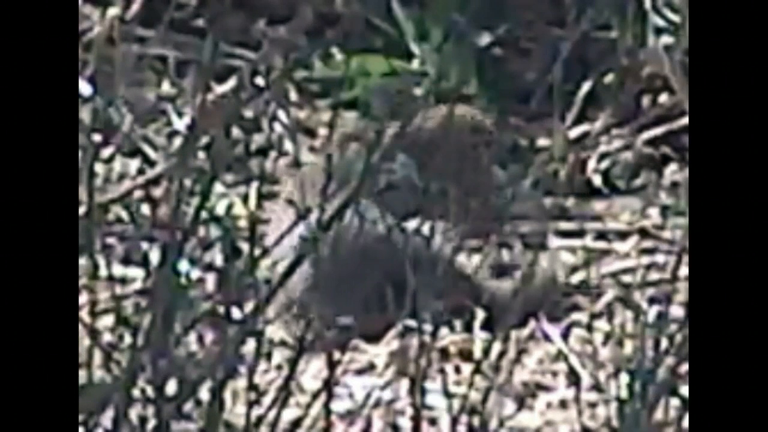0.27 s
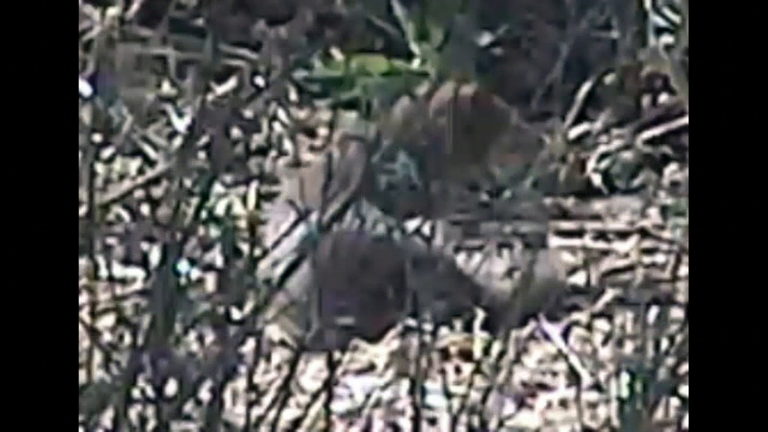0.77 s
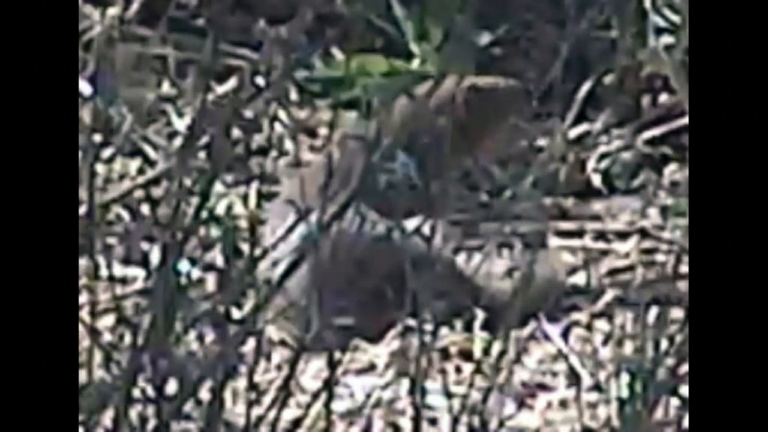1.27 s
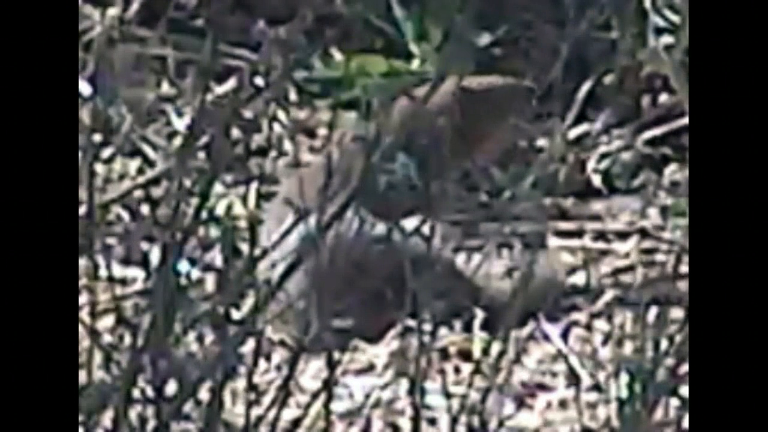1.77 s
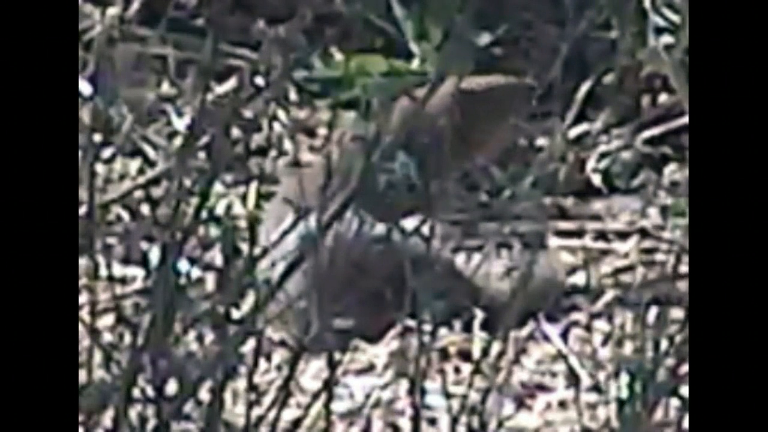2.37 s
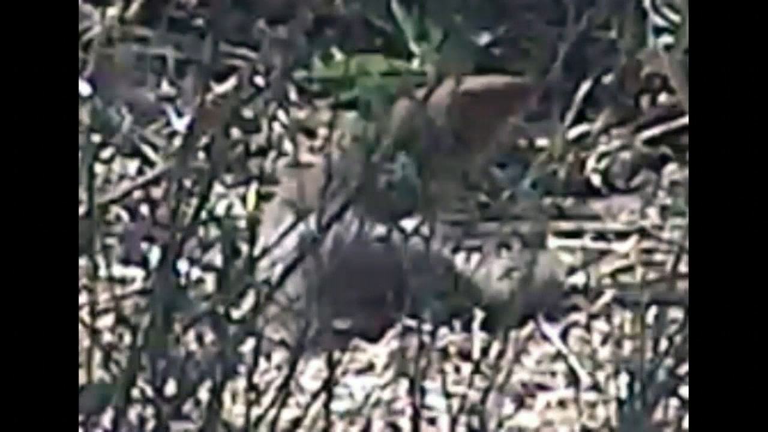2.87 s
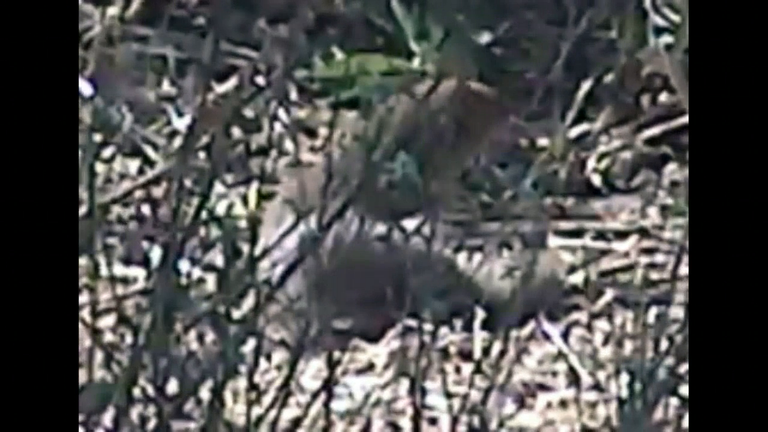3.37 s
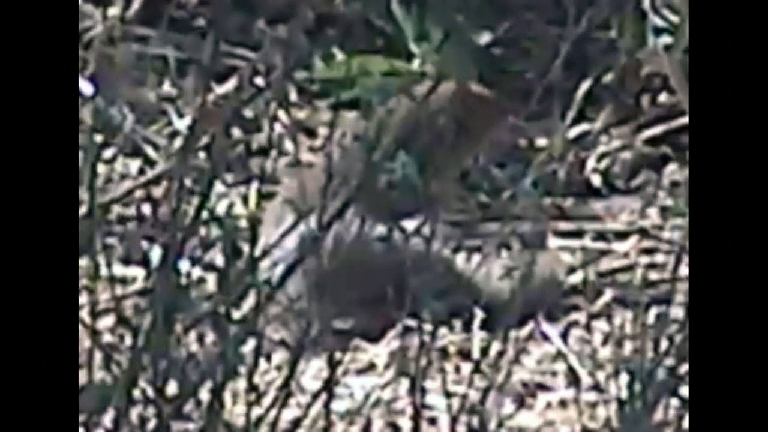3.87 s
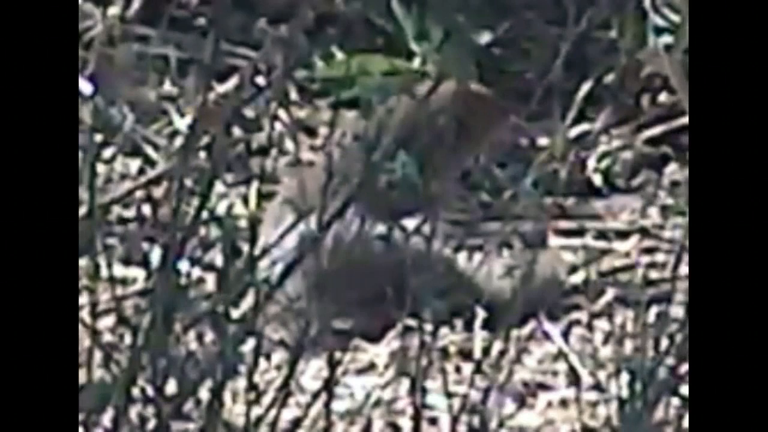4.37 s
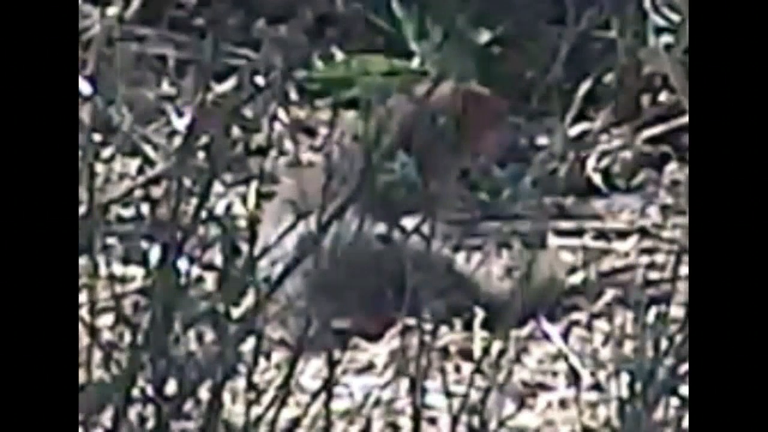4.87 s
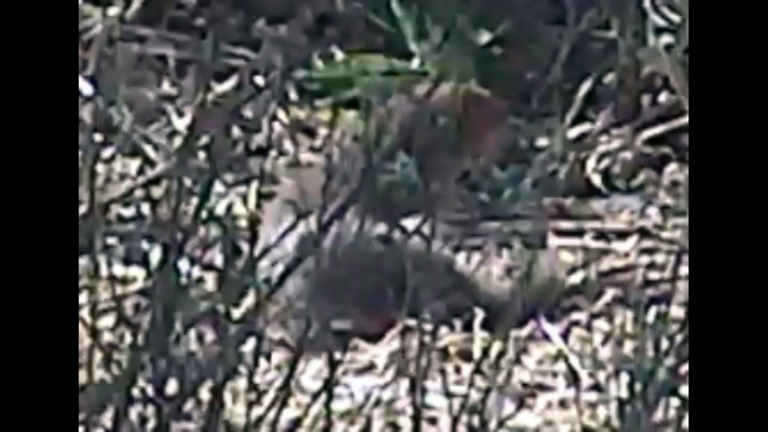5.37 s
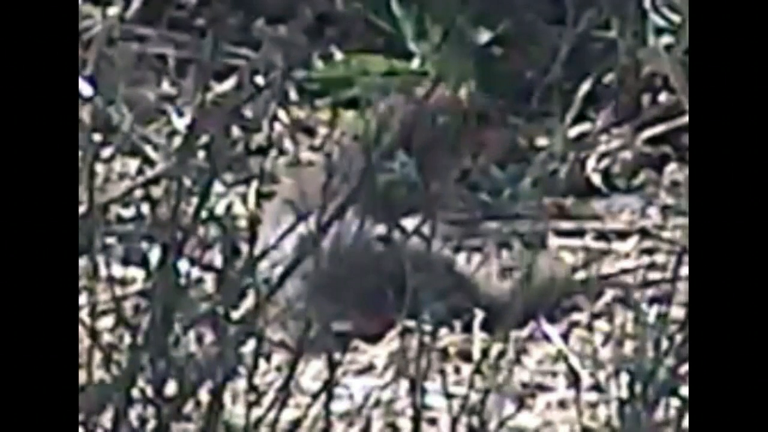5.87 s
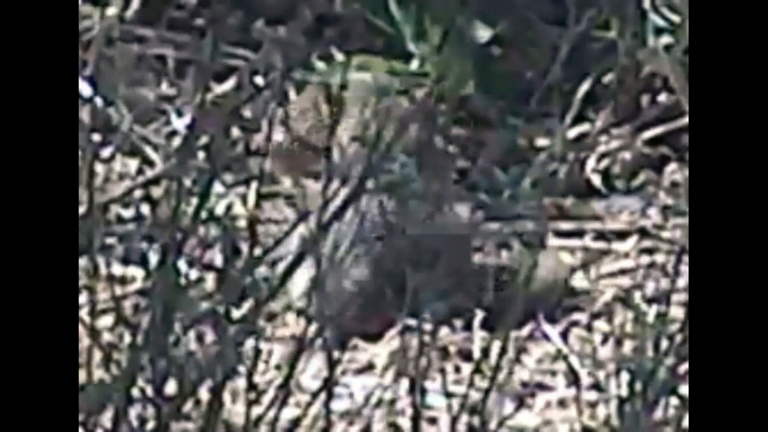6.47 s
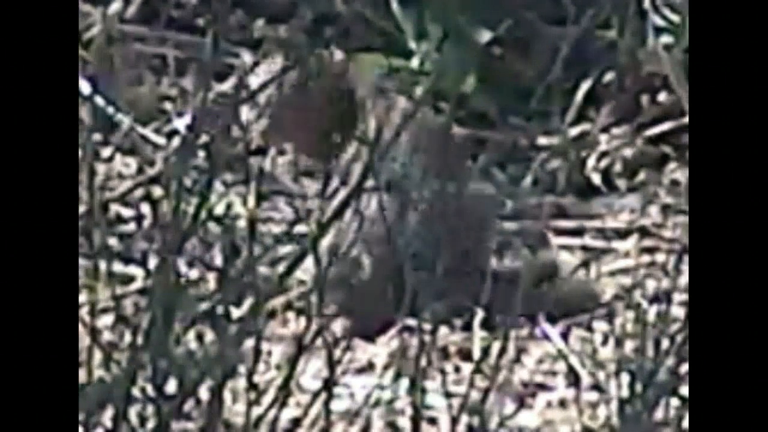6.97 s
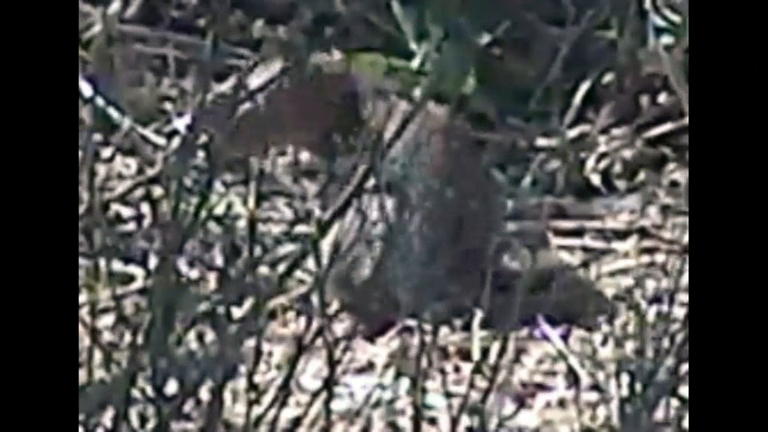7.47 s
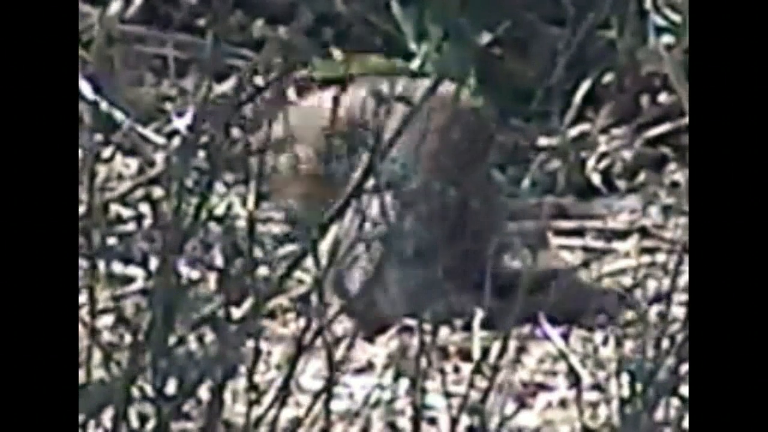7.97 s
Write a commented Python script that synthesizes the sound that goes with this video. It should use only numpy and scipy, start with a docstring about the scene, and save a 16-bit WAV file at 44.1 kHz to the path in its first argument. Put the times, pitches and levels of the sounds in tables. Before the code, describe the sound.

A dense outdoor chorus of small callers fills dry scrub by a waterhole: grainy, rasping clicks in overlapping bursts, mostly mid to high pitched, sprinkled with countless tiny falling chirps. From 0 to 3 s it is full and busy, loudest at the very start, with thin wheezy whistles sliding and warbling nearby. After 3 s it thins, reaching its quietest around 4 to 5 s, where separate rasping bursts and faint squeaks show through. From about 5.3 to 6.2 s quick, sharp little chirps cluster; then the crowd thickens steadily, with fewer distinct whistles, and is strong again by 8 s. Faint, brief rising water plops occur near 0.3, 1.2, 2.1, 3.3 and 7.2 s. Soft hiss and a very low steady mains hum lie beneath. The mono pickup is narrow, with blunted treble and only slight close echoes.

```python
"""Dry scrub by a waterhole, with a dense chorus: a crowd of small callers rasps in swelling, overlapping bursts,
made of uneven clicks in narrow bands. Nearer callers stand out as thin, wheezy whistles, which are gliding
sines, among many short chirps. A few drops plop in the water as brief rising sines. Below lie a soft hiss of
shaped noise and the mains hum of the recorder's line, whose narrow channel cuts the treble."""
import sys
import numpy as np
from scipy import signal
from scipy.fft import rfft, irfft
from scipy.io import wavfile

SR = 44100
rng = np.random.default_rng(int(sys.argv[2]) if len(sys.argv) > 2 else 0)


def master_out(mix):
    """Clip the mix to full scale and print it as 16-bit PCM to the path in sys.argv[1]."""
    frames = np.transpose(np.atleast_2d(mix))
    ceiling = np.clip(frames, -1, 1)
    pcm = np.round(ceiling * 32767).astype(np.int16)
    wavfile.write(sys.argv[1], SR, pcm)


N = 361179   # length in samples
CUTOFF_HZ = 6880   # top of the narrow channel

# Pitches that anchor the low, middle and high voices of the crowd, [Hz].
REGISTER_HZ = (1900, 3300, 5400)


def from_db(db):
    """Decibels to an amplitude factor."""
    return 10 ** (np.asarray(db) / 20)


def rms_one(x):
    """Scales a signal to an RMS of 1."""
    return x / np.sqrt(np.mean(x ** 2) + 1e-20)


def at_hz(points, hz):
    """Reads a colour curve of (Hz, dB) points along log frequency."""
    point_hz, point_db = np.transpose(points)
    return np.interp(np.log(hz), np.log(point_hz), point_db)


def drift(rate_hz):
    """Slow chance: coarse noise through a double one-pole low-pass, with a spread of 1."""
    step, settle = 40, 2000   # samples per coarse step; coarse steps dropped while the filter settles
    pole = np.exp(-2 * np.pi * rate_hz * step / SR)
    noise = rng.standard_normal(N // step + settle + 2)
    slow = signal.lfilter([1], [1, -2 * pole, pole * pole], noise)[settle:]
    return np.interp(np.arange(N) / step, np.arange(len(slow)), rms_one(slow))


def add(out, start_s, sound):
    """Mixes a sound in from its start time."""
    i = max(round(start_s * SR), 0)
    out[i:i + len(sound)] += sound[:N - i]


def loudness(hz):
    """Crowd level curve in dB at one pitch: swell read between the registers, nearby bursts and rasp colour."""
    # Swell of the whole crowd between bursts. Each row: time in seconds, level in dB ahead of the other
    # offsets, high voices against that level in dB.
    swell_rows = [(0.0, -22.5, -6), (.29, -28, -1.5), (.75, -28.5, -4.5), (.93, -30, -1.5),
                  (1.2, -29, -3.5), (2.2, -30.5, -2.5), (2.379, -33.5, -3), (2.55, -32, 1), (2.78, -31, -2),
                  (3.74, -36.5, -4.5), (4.1, -44, -6.5), (4.36, -43.5, -3), (4.52, -37.5, -7),
                  (4.62, -45, -1), (4.84, -34.5, -4.5), (4.99, -40.5, -7), (5.1, -37.5, -4.5),
                  (5.45, -33.5, -4), (6.02, -37, -0.5), (6.18, -33.5, -4), (7.2, -29.5, -8),
                  (7.5, -28.5, -7.5), (7.9, -29, -5.5), (8.19, -25.5, -5.5)]
    # Groups of callers bursting out together. Each row: time in seconds, centre in Hz,
    # lift in dB at that time and pitch.
    burst_rows = [(.39, 1910, 3.5), (.53, 5430, 4.5), (.66, 3000, 3.5), (.85, 3200, 2.5), (1.53, 2180, 2),
                  (1.71, 2840, 2), (2.17, 1900, 4), (2.28, 2820, 3.5), (2.83, 4500, 4), (3.001, 2200, 6.5),
                  (3.26, 4000, 7), (3.46, 2200, 4.5), (3.85, 2300, 9), (3.99, 4860, 7), (4.19, 2800, 10),
                  (4.26, 5400, 6.5), (4.44, 2970, 7.5), (4.72, 5400, 3.5), (4.89, 3280, 2),
                  (4.9, 5200, 2.5), (5.08, 3300, 8), (5.16, 1900, 5), (5.36, 3430, 7.5), (5.85, 4530, 5.5),
                  (5.97, 2600, 10), (6.157, 4000, 6), (6.25, 1900, 2.5), (6.5, 2600, 3), (7.1, 2560, 2.5),
                  (7.22, 2600, 1), (7.809, 4130, 4.5), (8.06, 4500, 4)]
    # Colour of the rasp inside the registers. Each row: frequency in Hz, relative level in dB.
    rasp_colour = [(900, -20.5), (1300, -13.5), (1700, -6.5), (2200, -1), (2800, 1.5), (3400, 0),
                   (4200, -6), (5000, -4.5), (5800, -4.5), (6250, -15), (6500, -14.5), (6800, -25)]
    low_voices_db, middle_voices_db = -10.5, -6   # against the level
    burst_s, burst_octaves = .045, .99   # spread of a burst in time and in pitch

    t = np.arange(0, N / SR + .01, .005)
    swell_s, level_db, high_voices_db = np.transpose(swell_rows)
    low, middle, high = [np.interp(np.log(hz), np.log(REGISTER_HZ), one) for one in np.eye(3)]
    register_db = low * low_voices_db + middle * middle_voices_db + high * high_voices_db
    swell = np.interp(t, swell_s, level_db + register_db)

    when_s, centre_hz, lift_db = np.transpose(burst_rows)
    near = lift_db * np.exp(-.5 * (np.log2(hz / centre_hz) / burst_octaves) ** 2)
    lift = near @ np.exp(-.5 * ((t - when_s[:, None]) / burst_s) ** 2)
    return np.interp(np.arange(N) / SR, t, swell + lift) + at_hz(rasp_colour, hz)


def crowd(grain_db, burst_db, own_db):
    """Dense uneven clicks in narrow neighbouring bands; chance bursts cover several bands at once."""
    grain = from_db(grain_db * rng.standard_normal((2, N)))
    clicks = rng.standard_normal((2, N)) * grain
    edges_hz = np.linspace(800, 6900, num=21)
    bursts = [drift(8.0) for _ in range(6)]
    rattle_db = .52 * drift(21)   # fast throb shared by all bands
    out = np.zeros(N)
    for k, (low_hz, high_hz) in enumerate(zip(edges_hz, edges_hz[1:])):
        band_pass = signal.butter(2, [low_hz, high_hz], "band", fs=SR, output="sos")
        band = signal.sosfilt(band_pass, clicks[k % 2])
        # Crossfade from one burst curve to the next over four bands.
        group, share = divmod(k / 4, 1)
        burst = np.sqrt(1 - share) * bursts[int(group)] + np.sqrt(share) * bursts[int(group) + 1]
        chance_db = rattle_db + burst_db * burst + own_db * drift(11)
        out += rms_one(band) * from_db(loudness((low_hz + high_hz) / 2) - 8.5 + chance_db)
    return out


def glide(long_s, first_hz, middle_hz, last_hz, level_db, waver_hz, flutter_db, fade_s=.007):
    """A near sine bending through three pitches; the given chance curves waver its pitch and flutter its level."""
    u = np.linspace(0, 1, num=round(long_s * SR))
    # A random stretch of the chance curves, centred on zero.
    i = rng.integers(0, N - SR) + np.arange(len(u))
    waver = waver_hz[i] - waver_hz[i].mean()
    flutter = flutter_db[i] - flutter_db[i].mean()
    # Parabola through the pitches at start, middle and end.
    hz = first_hz * (1 - u) * (1 - 2 * u) + middle_hz * 4 * u * (1 - u) + last_hz * u * (2 * u - 1)
    fade = np.clip(np.minimum(u, 1 - u) * long_s / fade_s, 0, 1)
    tone = np.sin(2 * np.pi * np.cumsum(hz + waver) / SR)
    return np.sqrt(2) * fade * from_db(level_db + flutter) * tone


def whistles():
    """Near callers: thin gliding sines whose quick chance in pitch and level makes them warble and wheeze."""
    # Each row: start in seconds, length in seconds (both without the margin), first, middle and last pitch
    # in Hz, RMS level in dB around which it flutters.
    whistle_rows = [(0.038, 0.045, 3370, 3210, 3160, -34.5), (0.046, 0.19, 5470, 5340, 5160, -34.5),
                    (0.146, 0.13, 6100, 5890, 5910, -35), (0.178, 0.11, 3750, 3506, 3560, -34),
                    (0.489, 0.048, 2430, 2360, 2300, -39.5), (0.522, 0.099, 5380, 5360, 5160, -34),
                    (0.642, 0.067, 4400, 4070, 3900, -35), (0.64, 0.057, 3500, 3500, 3420, -35.5),
                    (0.597, 0.082, 5990, 5950, 5740, -37.5), (0.668, 0.081, 5310, 5350, 5270, -37.5),
                    (0.708, 0.12, 3320, 3480, 3560, -35.5), (0.726, 0.12, 3880, 4060, 4130, -40),
                    (0.832, 0.078, 3520, 3190, 3050, -30.5), (0.911, 0.029, 3200, 3080, 2930, -32),
                    (0.935, 0.084, 3130, 3230, 3190, -36), (1.029, 0.09, 5360, 5260, 5340, -35.5),
                    (1.123, 0.24, 5130, 4960, 5060, -38), (1.255, 0.125, 3460, 3330, 3260, -36.5),
                    (1.395, 0.08, 3070, 3010, 2900, -37.5), (1.41, 0.18, 3360, 3390, 3560, -37.5),
                    (1.522, 0.047, 5800, 5855, 5800, -36.5), (1.533, 0.028, 3240, 3070, 3170, -35),
                    (1.563, 0.035, 2725, 2450, 2400, -37.5), (1.652, 0.047, 2755, 2514, 2300, -36),
                    (1.677, 0.069, 2944, 3100, 3250, -38), (1.97, 0.11, 3880, 3600, 3280, -39.5),
                    (2.027, 0.039, 5660, 5520, 5500, -36.5), (2.07, 0.035, 5330, 5410, 5300, -32),
                    (2.099, 0.14, 3130, 2985, 2860, -40.5), (2.245, 0.06, 2624, 2760, 2750, -39),
                    (2.21, 0.06, 5350, 5400, 5250, -40.5), (2.346, 0.067, 2740, 2790, 2760, -38),
                    (2.434, 0.028, 5500, 5170, 4770, -42), (2.497, 0.097, 5700, 5790, 5660, -37.5),
                    (2.586, 0.045, 5450, 5460, 5560, -36.5), (2.65, 0.1, 5570, 5710, 5670, -32),
                    (2.725, 0.087, 3280, 2950, 2690, -41), (3.084, 0.04, 3390, 3600, 4040, -37),
                    (3.121, 0.034, 3880, 3710, 3540, -37), (3.15, 0.055, 3950, 3810, 3830, -43.5),
                    (3.137, 0.038, 5100, 5050, 4880, -52), (3.201, 0.057, 4850, 4640, 4400, -41),
                    (3.261, 0.1, 4370, 4150, 4000, -44), (3.365, 0.15, 5220, 5200, 5250, -43),
                    (3.539, 0.1, 3800, 3790, 3400, -46), (3.613, 0.021, 6080, 5500, 5300, -39.5),
                    (3.664, 0.019, 5230, 5900, 5170, -40), (3.678, 0.015, 3300, 3480, 3570, -36),
                    (3.706, 0.012, 3750, 3410, 3400, -30.5), (3.722, 0.02, 3500, 3600, 3450, -38.5),
                    (3.754, 0.089, 3000, 2240, 1460, -50.5), (3.781, 0.029, 3500, 3380, 3400, -36.5),
                    (4.268, 0.1, 4730, 4730, 4920, -44), (4.288, 0.092, 3200, 3280, 3200, -44),
                    (4.352, 0.063, 4750, 4760, 4940, -43), (4.419, 0.045, 4950, 5040, 5050, -45),
                    (4.384, 0.082, 3220, 3130, 2960, -43.5), (4.466, 0.13, 3035, 3090, 2970, -48),
                    (4.42, 0.052, 2800, 2570, 2450, -43), (4.632, 0.26, 6070, 6260, 5750, -50),
                    (4.862, 0.019, 6400, 5880, 5820, -44), (4.897, 0.019, 6000, 5870, 5830, -38),
                    (5.267, 0.15, 5790, 5820, 5870, -41), (5.404, 0.068, 5670, 5450, 5480, -43),
                    (5.403, 0.018, 3380, 3330, 3250, -37.5), (5.418, 0.022, 3350, 3650, 3560, -38),
                    (5.46, 0.017, 3900, 3680, 3500, -38), (5.481, 0.16, 4770, 5030, 5090, -41),
                    (5.55, 0.082, 5110, 5250, 5410, -35.5), (5.576, 0.022, 3480, 4020, 3450, -35),
                    (5.63, 0.034, 3590, 3730, 3760, -37.5), (5.63, 0.034, 3750, 2800, 1950, -43),
                    (5.667, 0.033, 1880, 1700, 1720, -48), (5.742, 0.048, 3600, 3270, 3520, -39),
                    (5.798, 0.015, 4170, 4100, 3820, -34.5), (5.827, 0.045, 3500, 3280, 3500, -38.5),
                    (5.872, 0.035, 5200, 5100, 5150, -41), (5.908, 0.027, 3480, 3330, 3270, -32),
                    (5.962, 0.046, 3300, 3760, 3250, -35.5), (5.999, 0.023, 5340, 5130, 4900, -30.5),
                    (6.065, 0.037, 4220, 3750, 3200, -45), (6.096, 0.017, 5740, 5620, 5300, -36.5),
                    (6.127, 0.046, 3520, 3690, 3380, -36), (6.141, 0.038, 5230, 5030, 4800, -34.5),
                    (6.295, 0.04, 3760, 3750, 3830, -44), (6.436, 0.045, 3800, 3710, 3830, -40.5),
                    (6.54, 0.07, 3550, 3170, 3090, -43), (6.61, 0.064, 3100, 3900, 4280, -47),
                    (6.738, 0.03, 5400, 5200, 5050, -42), (6.789, 0.093, 4000, 3300, 3080, -46),
                    (7.05, 0.049, 5850, 5700, 5460, -40.5), (7.118, 0.046, 2600, 2390, 2150, -38),
                    (7.203, 0.05, 3250, 2915, 2790, -38.5), (7.358, 0.049, 2850, 2736, 2830, -40.5),
                    (7.589, 0.066, 4960, 4880, 4980, -43), (7.675, 0.044, 3780, 3930, 4050, -39),
                    (7.679, 0.027, 3220, 3180, 3140, -36), (7.932, 0.042, 4200, 3990, 3700, -37.5),
                    (8.088, 0.063, 2550, 2490, 2500, -38.5)]
    margin_s = .006   # extra room at each end for the fades
    out = np.zeros(N)
    waver_hz, flutter_db = 30 * drift(60), 2.8 * drift(55)
    for start_s, long_s, *voice in whistle_rows:
        add(out, start_s - margin_s, glide(long_s + 2 * margin_s, *voice, waver_hz, flutter_db))
    return out


def chirps(far_db, count):
    """Many short, mostly falling, buzzy glides, each set against the crowd's curve at its onset by far_db and chance."""
    out = np.zeros(N)
    waver_hz, flutter_db = 40 * drift(70), 3.5 * drift(60)
    levels = [loudness(hz)[::441] for hz in REGISTER_HZ]   # 100 values a second
    for when, pitch, length, bend, arch, size in rng.random((count, 6)):
        start_s = when * N / SR
        hz = 2000 + 4200 * pitch
        long_s = .015 + .05 * length ** 3   # mostly short
        crowd_db = np.interp(hz, REGISTER_HZ, [level[int(start_s * 100)] for level in levels])
        level_db = crowd_db + far_db + 5 * size ** 2
        fall_hz = 600 * (bend - .25)   # negative for a rise
        middle_hz = hz + 200 * (arch - .3)
        chirp = glide(long_s, hz + fall_hz / 2, middle_hz, hz - fall_hz / 2, level_db, waver_hz, flutter_db)
        add(out, start_s, chirp)
    return out


def scrub(x, echo_db):
    """Three faint echoes from ground and bushes, as delayed copies."""
    out = x.copy()
    for lag_s in (.011, .023, .041):
        add(out, lag_s, from_db(echo_db) * x)
    return out


def drops():
    """A trapped bubble rings briefly as a decaying sine and rises in pitch as it nears the surface."""
    # Each row: start in seconds, level in dB from which the ring decays, starting pitch in Hz.
    drop_rows = [(0.295, -47, 556), (0.369, -41.5, 520), (1.159, -45.5, 750), (2.072, -44.5, 750),
                 (3.098, -50, 350), (3.331, -42.5, 560), (3.876, -49, 340), (5.479, -54, 370),
                 (7.242, -47.5, 485)]
    attack_s, decay_s = .00072, .063   # linear rise; time to fall by 60 dB
    out = np.zeros(N)
    t = np.arange(round(.06 * SR)) / SR
    for start_s, level_db, hz in drop_rows:
        phase = 2 * np.pi * hz * (t + 12 * t ** 2)
        envelope = from_db(level_db - 60 * t / decay_s) * np.minimum(t / attack_s, 1)
        add(out, start_s, envelope * np.sin(phase))
    return out


def air():
    """Smooth hiss of air and recorder: noise coloured in the spectrum and cut at the channel's top."""
    # Each row: frequency in Hz, relative density in dB per Hz.
    hiss_colour = [(20, -18), (40, -1.5), (75, 2), (125, -1.5), (200, -9), (300, -5), (500, 4), (900, 1.5),
                   (1600, -5.5), (6500, -15)]
    hiss_db = -58   # RMS
    hz = np.maximum(np.arange(N // 2 + 1) * SR / N, 1)
    spectrum = rfft(rng.standard_normal(N)) * from_db(at_hz(hiss_colour, hz)) * (hz < CUTOFF_HZ)
    return from_db(hiss_db) * rms_one(irfft(spectrum, N))


def hum():
    """Mains hum: sines at odd multiples of the mains, wavering slightly in level."""
    # Each row: multiple of the mains frequency, RMS level in dB around which the tone wavers.
    tone_rows = [(1, -70.5), (3, -63.5), (5, -70.5), (7, -77.5), (9, -84)]
    mains_hz, waver_db = 50.07, 2.0
    turn = 2 * np.pi * mains_hz * np.arange(N) / SR
    out = np.zeros(N)
    for multiple, level_db in tone_rows:
        level = from_db(level_db + waver_db * drift(13.0))
        out += np.sqrt(2) * level * np.sin(round(multiple) * turn)
    return out


def scene():
    """Rasping crowd, whistles and chirps with their echoes, then drops, hiss and hum, in mono."""
    far = chirps(far_db=-12.0, count=1700)   # 12 to 7 dB below the crowd's curve
    calls = scrub(whistles() + far, echo_db=-21)
    rasp = crowd(grain_db=3.0, burst_db=1.38, own_db=2.21)
    return (rasp + calls + drops() + air() + hum())[None]


def record(dry):
    """The narrow channel ends in a steep cut; a slight square-law bend adds a very faint shimmer above it."""
    # Bottom and top of the shimmer, [Hz].
    shimmer_hz = (9000, 15700)
    bend_db = -19   # gain on the squared line
    channel = signal.ellip(12, .3, 60, CUTOFF_HZ, fs=SR, output="sos")
    line = signal.sosfilt(channel, dry)
    above = signal.cheby2(10, 50, shimmer_hz[0], "high", fs=SR, output="sos")
    shimmer = signal.sosfilt(above, line ** 2)
    top = signal.cheby2(12, 60, shimmer_hz[1], fs=SR, output="sos")
    return signal.sosfilt(top, line + from_db(bend_db) * shimmer)


dry = scene()
out = record(dry)
master_out(out)
```